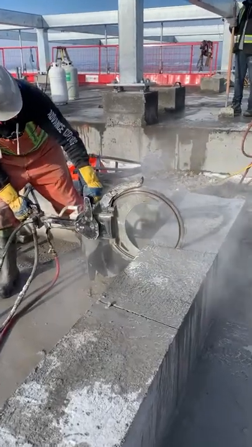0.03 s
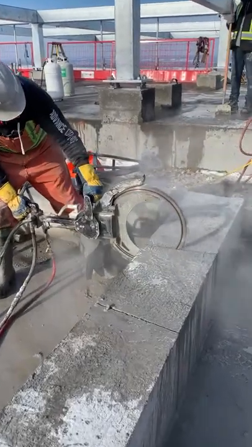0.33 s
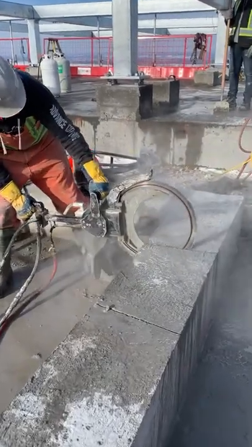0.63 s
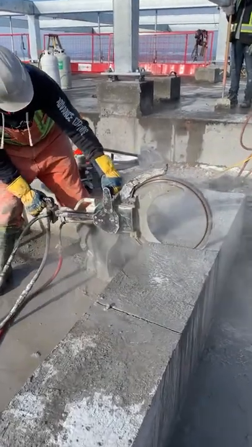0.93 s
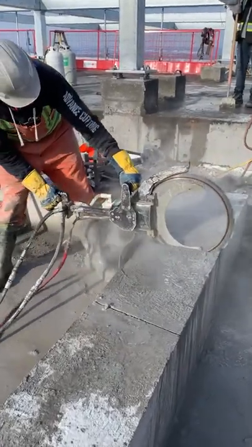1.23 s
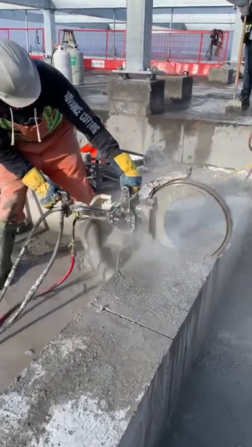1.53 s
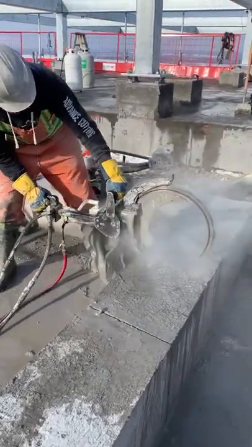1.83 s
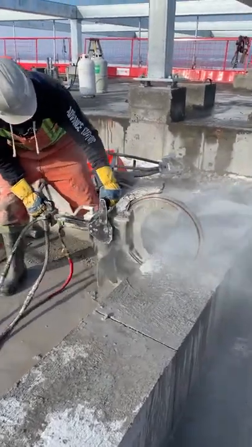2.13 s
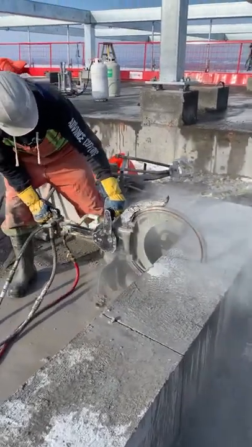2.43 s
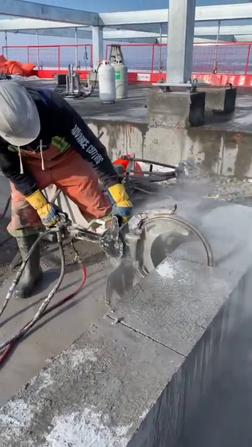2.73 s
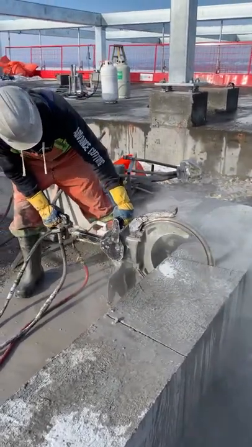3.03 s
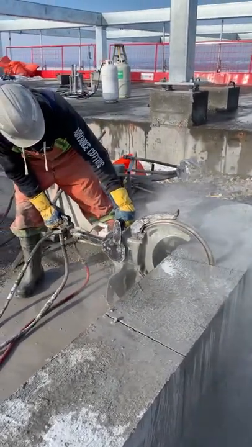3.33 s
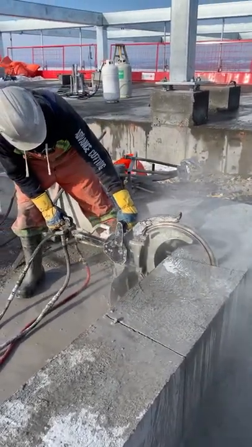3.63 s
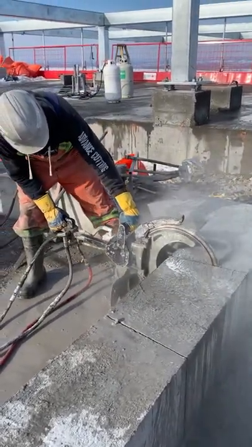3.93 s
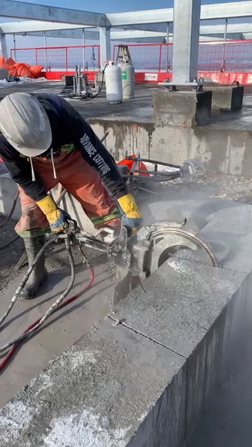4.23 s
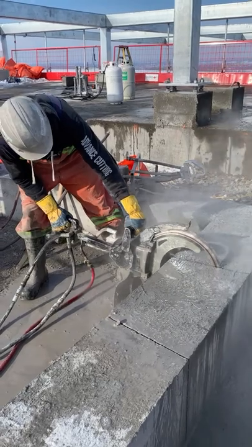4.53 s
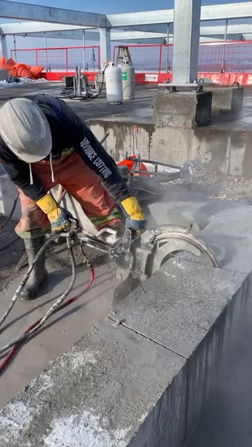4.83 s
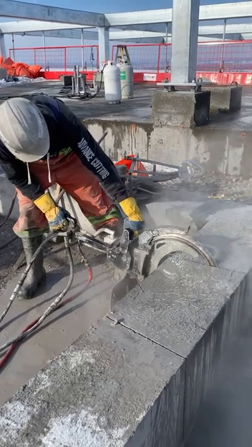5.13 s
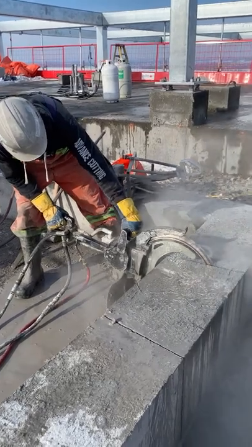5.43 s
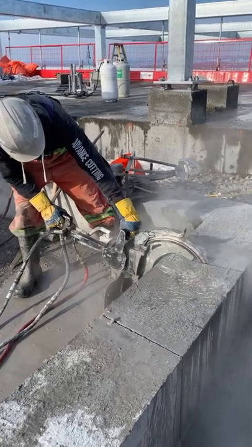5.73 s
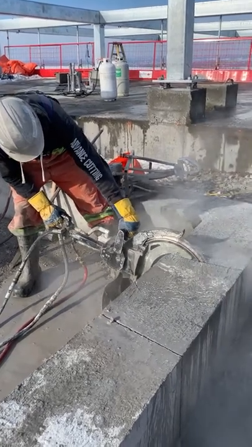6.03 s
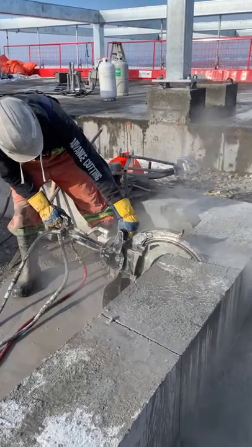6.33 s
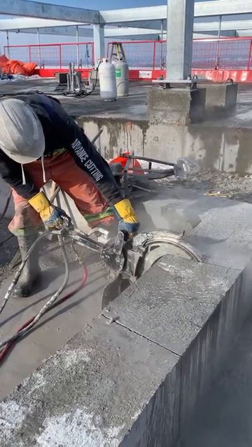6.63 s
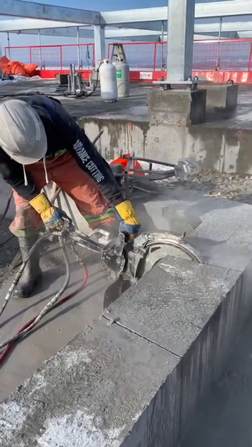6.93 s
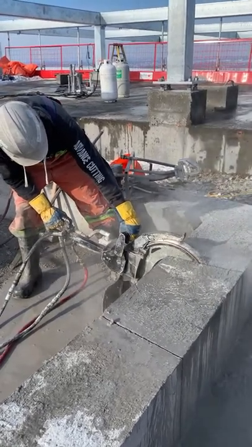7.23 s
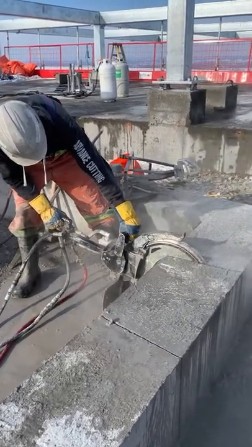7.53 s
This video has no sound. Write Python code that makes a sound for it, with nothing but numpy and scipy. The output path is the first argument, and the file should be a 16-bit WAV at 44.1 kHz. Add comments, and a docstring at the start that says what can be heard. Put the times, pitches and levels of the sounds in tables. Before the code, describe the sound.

A large hydraulic saw cuts wet concrete outdoors, heard from about two metres. Loud, gritty grinding and a fine hiss of water spray run throughout, with a small engine thudding behind. At first the cut is raspy, the motor's whine rising and sagging, and a few chips snap off. As the blade sinks deeper, the hiss dulls a little, the steel rings more and the whine steadies.

```python
"""Outdoors, a phone about two metres from a hydraulic ring saw in a wet concrete slab.
From the start the single-cylinder power pack thuds behind it, and diamond segments grind grit in a
fine water spray. For two seconds the cut is shallow and raspy; the motor whines and sags as the ring
bites, and chips snap off. The phone moves a step sideways and the ring sinks. By six seconds it is
deep in the slot, which muffles the hiss and steadies the whine."""
import sys
import numpy as np
from scipy import signal
from scipy.fft import rfft, irfft
from scipy.io import wavfile
from scipy.ndimage import uniform_filter1d

SR = 44100
rng = np.random.default_rng(int(sys.argv[2]) if len(sys.argv) > 2 else 0)


def log_audio(samples):
    """Write samples as a 16-bit WAV file to the path given in sys.argv[1]."""
    # one column per channel
    frames = np.atleast_2d(samples).T
    # limit to full scale, then quantise
    limited = np.clip(frames, -1, 1)
    pcm = np.round(limited * 32767).astype(np.int16)
    wavfile.write(sys.argv[1], SR, pcm)


N = 343980
TIME = np.arange(N) / SR
FREQS = np.fft.rfftfreq(N, 1 / SR)
CRUISE_HZ, FIRING_HZ = 650, 29.8  # usual rates of the motor's oil pulses and the engine's firings
SEGMENTS, SEGMENT_RATIO = 22, .786  # segments on the ring; segment strikes per oil pulse

# Stereo image of the sound; the treble is narrow and wide in alternate bands.
# Each row: frequency in Hz, lead of the left channel in radians, left-right likeness from 0 to 1.
STEREO_IMAGE = [(0, 0, .7), (150, .15, .65), (430, .7, .45), (680, .7, .76), (950, 1.05, .42),
                (1130, -.3, .66), (1600, 0, .88), (1770, .3, .68), (1950, 1.1, .84), (2170, 2.05, .6),
                (2520, 2.8, .72), (2820, 2.9, .68), (3020, 1.55, .38), (3300, 1.5, .58), (3700, 1.7, .54),
                (4150, 2.5, .72), (4300, 3.14, .99), (5050, 3.14, .99), (5250, 4, .72), (5750, 4.7, .6),
                (6150, 5.4, .75), (6350, 6.28, .99), (7450, 6.28, .99), (7650, 7.2, .65), (8150, 8.5, .6),
                (8350, 9.42, .99), (9550, 9.42, .99), (9750, 10.4, .58), (10250, 11.6, .6),
                (10450, 12.57, .99), (11600, 12.57, .99), (11800, 13.4, .66), (12330, 14.7, .62),
                (12500, 15.71, .99), (13700, 15.71, .99), (13850, 16.6, .63), (14400, 18, .63),
                (14550, 18.85, .99)]
# Bending modes of the steel ring. Each row: frequency in Hz, width in Hz, relative level in dB.
RING_MODES = [(3050, 50, -7), (3420, 70, -6), (3850, 35, -3), (4150, 90, -3), (4800, 70, -2),
              (5310, 130, 2), (5650, 40, -3), (6080, 120, 1), (6500, 60, -5), (8880, 100, -6),
              (9350, 130, -4), (9850, 120, -2.5), (10950, 90, -4.5), (11400, 70, -3), (11880, 130, -1)]


def undb(db):
    """Decibels to gain."""
    return 10 ** (np.asarray(db) / 20)


def level(x, db):
    """Scale to an rms level."""
    return x * undb(db) / np.sqrt(np.mean(x ** 2))


def curve(points):
    """A value per sample through (seconds, value) points."""
    return np.interp(TIME, *np.transpose(points))


def swell(s, half_length):
    """A smooth rise from 0 to 1 and back around a moment."""
    return np.exp(-((TIME - s) / half_length) ** 2)


def walk(rate_hz):
    """Smooth random drift with a spread of 1."""
    drift = irfft(rfft(rng.standard_normal(N)) / (1 + (FREQS / rate_hz) ** 4), N)
    return drift / drift.std()


def turns(hz):
    """Phase in radians of something that repeats hz times a second."""
    return 2 * np.pi * np.cumsum(hz) / SR


def colour(points):
    """Gain per frequency through (Hz, dB) points."""
    hz, db = np.transpose(points)
    return undb(np.interp(np.log(FREQS + 1), np.log(hz), db))


def resonances(modes):
    """Gain per frequency of a body with (Hz, width, dB) modes and steep skirts."""
    return np.sqrt(sum(undb(db) ** 2 / (1 + ((FREQS - hz) / width) ** 2) ** 2 for hz, width, db in modes))


def in_stereo(excite, gain):
    """A spread-out source in stereo, at unit rms: a shared part, offset in phase, and one apart."""
    hz, *columns = np.transpose(STEREO_IMAGE)
    lead, alike = (np.interp(FREQS, hz, column) for column in columns)
    shared = rfft(excite()) * np.sqrt(1 + alike)
    apart = rfft(excite()) * np.sqrt(1 - alike)
    left, right = shared + apart, (shared - apart) * np.exp(-1j * lead)
    return level(irfft(gain * np.array([left, right]), N), 0)


def grit(spread_db):
    """Dense tiny fractures of very unequal size."""
    return rng.standard_normal(N) * undb(spread_db * rng.standard_normal(N // 8 + 1).repeat(8)[:N])


def drifting(x, ripple_db, width_hz, hold_s, size=2048):
    """Lay many narrow peaks over a sound; each swells and fades as the contact point moves."""
    _, _, cells = signal.stft(x, nperseg=size)
    ripple = rng.standard_normal(cells.shape[1:])
    for axis, span in enumerate([width_hz * size / SR, hold_s * 2 * SR / size]):
        for _ in range(2):
            ripple = uniform_filter1d(ripple, max(int(span), 1), axis=axis, mode="wrap")
    shaped = signal.istft(cells * undb(ripple_db * ripple / ripple.std()), nperseg=size)[1][:, :N]
    return shaped / shaped.std()


def site(site_db=-50, swell_db=.5):
    """The wash of the open site all around, swelling slowly."""
    # Outdoor background. Each row: frequency in Hz, relative level in dB.
    wash_spectrum = [(20, 0), (42, 5), (60, 5), (120, 2.5), (200, 5), (250, 6.5), (330, -1.5), (440, -8),
                     (600, -21), (1000, -10.5), (1700, -0.5), (2600, -62), (5000, -12.5)]
    wash = in_stereo(lambda: rng.standard_normal(N), colour(wash_spectrum))
    return wash * undb(site_db - swell_db * walk(1.5))


def exhaust(phase, moved, thud_db=-42, uneven_db=.85, smear=4.1):
    """Each firing sends a thud down the exhaust; the silencer smears it, high orders trailing."""
    # The exhaust note. Each row: multiple of the firing rate, relative dB at the phone's first
    # spot, relative dB at its second.
    harmonics = [(2, 3, 2.5), (3, -1, 0), (4, -18, -23), (5, -1.8, -5), (6, -3.5, -3.5), (7, -19, -17),
                 (8, -15.5, -10.5), (9, -14, -11), (10, -20.5, -13.5), (12, -25, -20), (13, -22.5, -20.5),
                 (16, -26, -21)]
    right_lag = np.array([[0], [.2]])  # radians; the thuds lean left and arrive there first
    thud = 0
    for k, first_db, second_db in harmonics:
        spot_db = first_db + moved * (second_db - first_db)
        pan_db = (1.9 if k > 3 else .3) * np.array([[.5], [-.5]])
        boom_db = 2 * swell(1.54, .39) * (k in (5, 6))  # the middle of the note swells for a moment
        harmonic = np.cos(k * phase - smear * k * np.log(k) - right_lag)
        thud = thud + undb(spot_db + pan_db + boom_db) * harmonic
    return level(thud, thud_db) * undb(-uneven_db * walk(15))


def knock(phase, centre_hz=670, width_hz=170, odd_db=-5):
    """The engine casing rings alike on every turn: high multiples of the firing rate, odd ones weaker."""
    orders = np.arange(17, 31)
    sizes = undb(odd_db * (orders % 2)) / (1 + ((orders * FIRING_HZ - centre_hz) / width_hz) ** 2)
    starts = rng.uniform(0, 2 * np.pi, len(orders))
    return level(sum(size * np.cos(k * phase + start) for k, size, start in zip(orders, sizes, starts)), 0)


def power_pack(motor_hz, droop_hz_per_hz=.0078, droop_lag_s=.192, knock_db=-58, clatter_db=-63):
    """The governed engine behind the saw: exhaust, casing and valves, drooping just after the motor."""
    # The phone's step sideways. Each row: time in seconds, share of the way to the second spot.
    sidestep = [(1.9, 0), (2.9, 0.88)]
    moved = curve(sidestep)
    lagged_motor_hz = np.interp(TIME - droop_lag_s, TIME, motor_hz)
    firing_hz = FIRING_HZ + droop_hz_per_hz * (lagged_motor_hz - CRUISE_HZ)
    phase = turns(firing_hz) + .006 * walk(12)
    thud = exhaust(phase, moved)
    valve_gate = 1 + np.cos(phase)  # the valves clatter once a cycle
    valve_tone = resonances([(240, 200, -.89), (670, 160, -1.1)])
    clatter = in_stereo(lambda: valve_gate * rng.standard_normal(N), valve_tone)
    return thud + undb(knock_db + 3 * moved) * knock(phase) + undb(clatter_db) * clatter


def chipping(decay_s=.0018, width_hz=3000, ring_share=.5):
    """Now and then a piece of aggregate snaps off: a dry crack that also strikes the ring."""
    # Chips leaving the slab. Each row: start in seconds, peak level in dB, centre in Hz.
    chips = [(1.578, -24, 7000), (1.584, -18, 7000), (1.811, -23, 6500), (2.089, -20, 14500),
             (4.844, -20, 14500), (6.029, -24, 6050), (7.248, -22, 10900)]
    cracks = 0
    for s, db, hz in chips:
        age = np.maximum(TIME - s, 0)
        burst = rng.standard_normal(N) * (age > 0) * np.exp(-age / decay_s)
        tone = resonances([(hz, width_hz, 0)]) + ring_share * resonances(RING_MODES)
        crack = in_stereo(lambda: burst, tone)
        cracks = cracks + undb(db) * crack / np.abs(crack).max()
    return cracks


def howl(segment_hz):
    """Where the ring rubs in the slot, it drives one resonance into a rough howl of steady pitch."""
    # Each row: middle in seconds, half length in seconds, pitch in Hz, width in Hz, top level in dB.
    rubs = [(1.577, 0.31, 757, 26, -50.5), (5.17, 0.25, 3900, 22, -46), (7, 1, 920, 130, -58.5)]
    drive = 1 + .3 * np.sin(turns(segment_hz))
    howls = 0
    for s, half_length, hz, width, db in rubs:
        ringing = in_stereo(lambda: drive * rng.standard_normal(N), resonances([(hz, width, 0)]))
        howls = howls + undb(db) * swell(s, half_length) * ringing
    return howls


def whine(motor_hz, depth, trim_db=-.83):
    """Oil pulses sing in the motor; the jolts of a shallow cut roughen each tone, the slot steadies it."""
    # Motor tones and their segment sidebands. Each row: multiple of the pulse rate, relative level
    # in dB in a shallow cut, dB gained at full depth.
    tones = [(.88, -69.5, 4), (1, -61.5, 0), (1.19, -70, 12), (1.76, -70, 4), (2, -57.5, 5),
             (2.19, -60.5, -1), (2.786, -62, -2), (3, -52, 4), (3.788, -54, -8), (4.57, -55.5, 4)]
    # Single tones swell or fade as the ring leans in the slot. Each row: middle in seconds,
    # half length in seconds, multiple of the pulse rate, change in dB.
    leans = [(.2, 0.19, 3, 6.5), (.6, 0.24, 3, 4), (.75, .2, 2.19, 8), (1.025, 0.14, 2, 9.5),
             (1.02, 0.19, 3, -1), (1.5, 0.12, 2, -14), (1.75, 0.18, 1.19, 14), (1.84, 0.08, 3, 6),
             (2.034, 0.087, 3, -4), (2.22, 0.17, 2, 5.5), (2.233, 0.071, 3.79, 12), (2.27, .08, 3, 5.5),
             (2.68, 0.084, 3, 5.5), (2.7, 0.22, 2, -9), (2.788, 0.11, 1, 14), (3.07, 0.11, 1, 9),
             (3.17, 0.087, 2, 3), (3.302, 0.17, 3, 4), (3.7, 0.23, 2, 3), (4.114, 0.094, 3, -12),
             (4.21, 0.34, 1, 8.5), (4.656, 0.13, 3, 8.5), (5.0, 0.47, 1, 6), (5.345, 0.15, 3, -7),
             (5.81, 0.1, 3, 8), (6.38, 0.34, 2.786, 12), (6.35, 0.3, 3.79, 10), (6.95, 0.39, 3.79, 11),
             (6.7, 0.84, 1.76, 5), (6.65, 0.53, 2, -4), (6.822, 0.081, 1, 14.5), (7.68, 0.13, 3, 3.5)]
    loose = (1 - depth) ** 2
    phase = turns(motor_hz) + (.022 + .19 * loose) * walk(45)
    image_hz, lead, _ = np.transpose(STEREO_IMAGE)
    creep = 5 * walk(2.5)  # the ring creeps on its drive roller, so the sidebands waver
    singing = 0
    for k, db, deep_db in tones:
        right_lag = np.interp(k * motor_hz, image_hz, lead) * np.array([[0], [1]])
        lean_db = sum(change * swell(s, half) for s, half, tone, change in leans if abs(tone - k) < .08)
        flutter_db = (1.8 + .7 * loose) * walk(25)
        slip = (.2 + .8 * loose) * walk(16)
        is_sideband = abs(k - round(k)) > .1
        amplitude = np.sqrt(2) * undb(db + deep_db * depth + lean_db + trim_db + flutter_db)
        singing = singing + amplitude * np.sin(k * phase + slip + is_sideband * creep - right_lag)
    return singing


def frame(motor_hz, depth, effort_db, beat_depth=.53, drone_db=-42.5, rasp_db=-42.5):
    """The grinding shakes the frame and guard into a drone; a shallow cut also rasps into the open air."""
    # Modes of the frame and guard. Each row: frequency in Hz, width in Hz, relative level in dB.
    frame_modes = [(582, 59, -1.5), (656, 95, 1.5), (772, 79, -2.5), (1100, 380, -7), (1243, 140, -3),
                   (1417, 210, -4), (1928, 80, 3.5), (2250, 183, 3), (2630, 43, 4.5), (3290, 164, 2)]
    drive = 1 + beat_depth * np.sin(SEGMENT_RATIO * turns(motor_hz))
    drone = in_stereo(lambda: drive * grit(spread_db=2.5), resonances(frame_modes))
    drone = drifting(drone, ripple_db=2.6, width_hz=50, hold_s=.12) * undb(drone_db + effort_db)
    rasp_tone = resonances([(950, 71, -8.5), (1580, 210, -1), (2060, 150, -9), (3610, 550, 3)])
    rasp = in_stereo(lambda: grit(spread_db=2.5), rasp_tone) * undb(rasp_db)
    return drone * (.86 + .14 * depth) + rasp * (1 - depth) ** 2


def effort(depth):
    """Extra dB of grinding, spray and drone at each bite; the first two also gain when half sunk."""
    # The ring bites harder or eases off. Each row: middle in seconds, half length in seconds,
    # then the change in dB of grinding, of spray and of frame drone.
    bites = [(.4, .4, -0.5, 2, -0.5), (1.25, 0.23, .5, -1.5, 1.5), (1.513, 0.17, 4.5, -2, -3.5),
             (1.77, 0.27, 1.5, -3, 2), (2.024, 0.059, -2, 0, -1.5), (2.223, 0.22, -0.9, 2.5, 1),
             (2.502, .07, -0.5, -0.5, 0.5), (2.724, 0.1, 1.3, -2.5, -1.5), (3.127, 0.078, 0.7, 0, 0.5),
             (4.4, 0.11, 0.8, 2.5, 1), (4.847, .05, 0, 2, -0.5), (5.352, .1, 2, 2, 0.5),
             (5.87, 0.15, -0.5, -2, 0)]
    half_sunk_db = np.outer([.14, 3.5, 0], 1 - (2 * depth - 1) ** 2)
    return half_sunk_db + sum(np.outer(change_db, swell(s, half)) for s, half, *change_db in bites)


def cutting(motor_hz, depth, grind_effort_db, spray_effort_db, scrape_db=-40.5, ring_db=-36.5):
    """Segments strike the stone in turn; the ring wobbles, rings, and flings water off as fine spray."""
    # Hiss of grit and spray. Each row: frequency in Hz, relative level in dB.
    hiss_spectrum = [(1500, -27), (2800, -13.5), (3750, -6.3), (4500, -3.2), (5300, -1.5), (6300, -1),
                     (7200, -2.6), (8000, -5), (9300, -1.7), (10400, -4.8), (11900, -1.6), (12600, -4.2),
                     (13300, -2.4), (14200, -1.2), (15150, 2), (15600, -1)]
    faster_hz = motor_hz - CRUISE_HZ
    buried_db = -4.5 * depth ** 3.2  # the slot muffles grinding and spray
    splash_db = .9 * walk(24)
    grind_db = -29.5 + .03 * faster_hz + buried_db + grind_effort_db
    spray_db = -27 + .0327 * faster_hz + buried_db + spray_effort_db + splash_db
    segment_phase = SEGMENT_RATIO * turns(motor_hz)
    wobble_db = .15 * np.sin(segment_phase / SEGMENTS)  # once a turn of the ring
    patches_db = walk(31)  # hard and soft aggregate makes the cut surge
    contact = (1 + .0073 * np.sin(segment_phase)) * undb(wobble_db + patches_db)
    # a steady scrape at the bottom, grinding in the middle, droplets at the top
    hiss = colour(hiss_spectrum)
    coarse = 1 / (1 + (FREQS / 4300) ** 16)
    fine = 1 / (1 + (11700 / (FREQS + 1)) ** 16)
    scrape = in_stereo(lambda: grit(spread_db=4), hiss * np.sqrt(coarse))
    scrape = drifting(scrape, ripple_db=3.5, width_hz=110, hold_s=.08) * undb(scrape_db)
    grinding = in_stereo(lambda: grit(spread_db=1.1), hiss * np.sqrt((1 - fine) * (1 - coarse)))
    grinding = drifting(grinding, ripple_db=2.4, width_hz=45, hold_s=.1) * undb(grind_db)
    spray = in_stereo(lambda: grit(spread_db=1.4), hiss * np.sqrt(fine))
    spray = drifting(spray, ripple_db=2.2, width_hz=45, hold_s=.06) * undb(spray_db)
    # the more of the ring rubs in the slot, the harder its modes are driven
    ring = in_stereo(lambda: grit(spread_db=2), resonances(RING_MODES))
    ring = drifting(ring, ripple_db=3.5, width_hz=60, hold_s=.4) * depth * undb(ring_db)
    return contact * (grinding + ring) + scrape + spray


def scene():
    """The saw in front, led by motor speed, depth of cut and bites; the engine and the site behind."""
    # The saw motor, sagging under load. Each row: time in seconds, rate of its oil pulses in Hz.
    pulse_rates = [(0, 622.8), (0.27, 714.7), (0.59, 674.6), (0.88, 611.8), (1.16, 615.0), (1.4, 594.0),
                   (1.64, 648.1), (1.76, 628.1), (2.11, 662.0), (2.25, 698.1), (2.53, 653.7), (2.71, 671.1),
                   (2.84, 615.2), (3.09, 645.2), (3.22, 675.0), (3.46, 659.1), (3.72, 633.0), (4.21, 650.4),
                   (4.6, 635.4), (5.29, 663.7), (5.8, 642.2), (6.17, 661.4), (7.07, 658.7), (7.29, 647.1),
                   (7.8, 646.3)]
    # How far the ring sits in the slab. Each row: time in seconds, depth from 0 to 1.
    cut_depths = [(0, 0), (.8, 0.15), (1.5, 0.08), (2.2, 0.19), (2.8, 0.35), (4, 0.67), (5.4, 0.89),
                  (6.2, 0.91), (7.8, 0.95)]
    motor_hz, depth = curve(pulse_rates), curve(cut_depths)
    grind_db, spray_db, drone_db = effort(depth)
    saw = cutting(motor_hz, depth, grind_db, spray_db) + frame(motor_hz, depth, drone_db)
    saw = saw + whine(motor_hz, depth) + howl(SEGMENT_RATIO * motor_hz) + chipping()
    return saw + power_pack(motor_hz) + site()


def record(dry):
    """The phone cuts the top steeply."""
    top_hz = 15600
    cut_db = np.clip((FREQS - top_hz) / 2, 0, 75)
    return irfft(rfft(dry) * undb(-cut_db), N)


dry = scene()
out = record(dry)
log_audio(out)
```